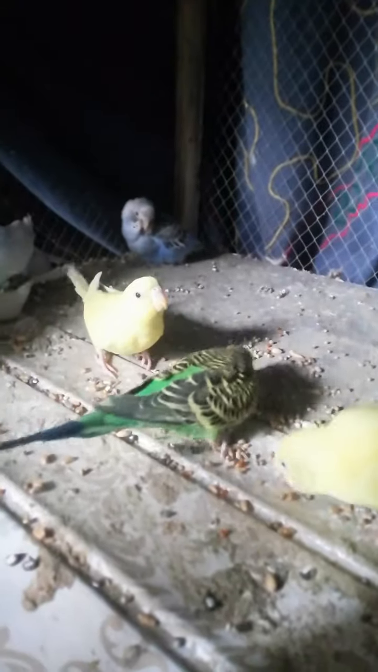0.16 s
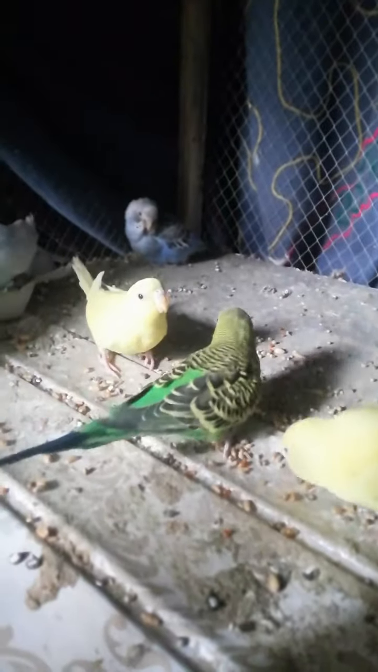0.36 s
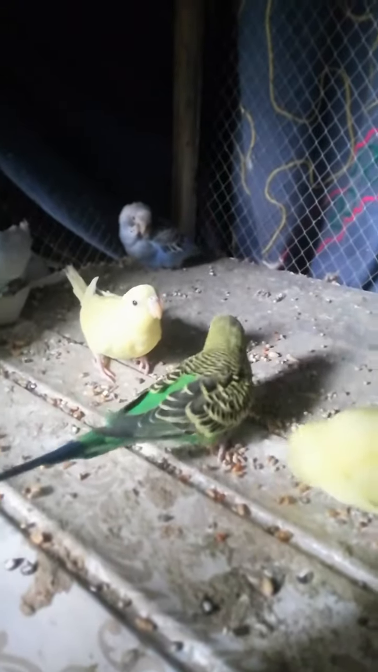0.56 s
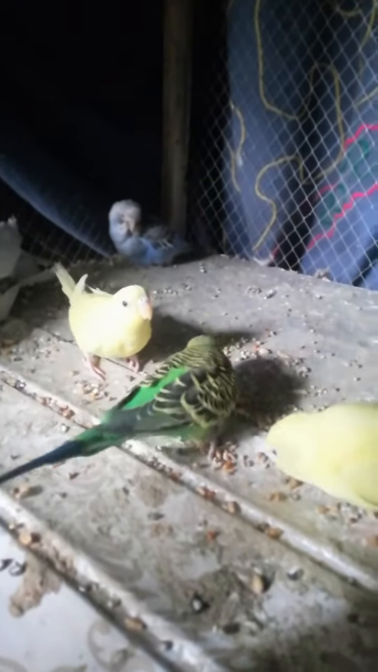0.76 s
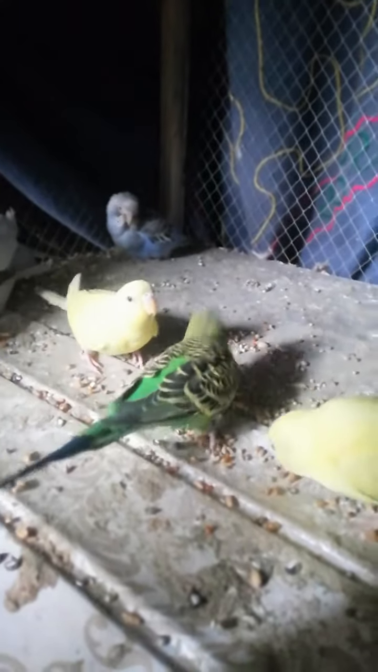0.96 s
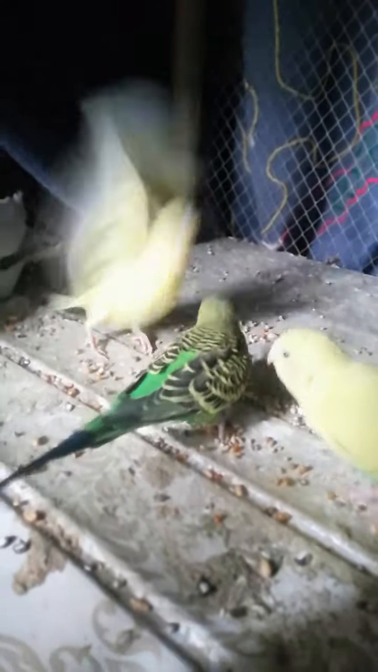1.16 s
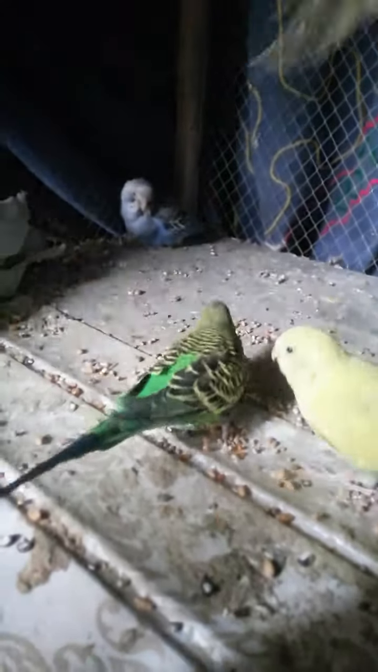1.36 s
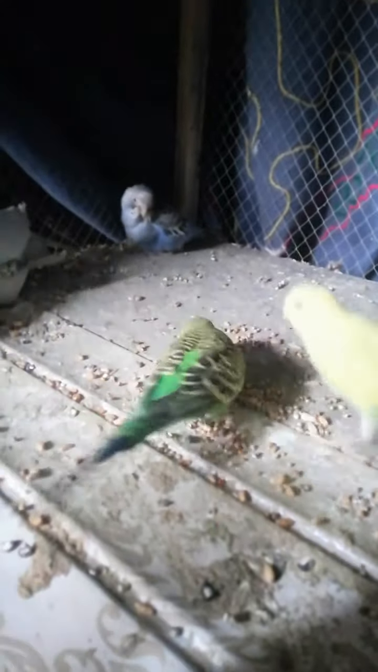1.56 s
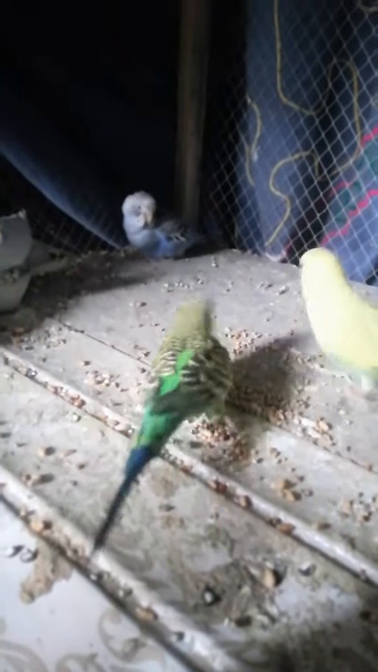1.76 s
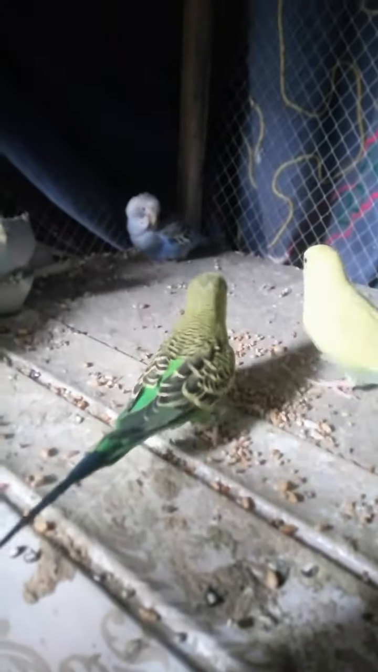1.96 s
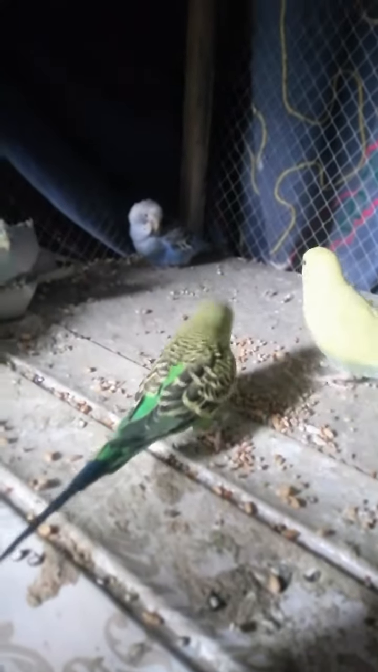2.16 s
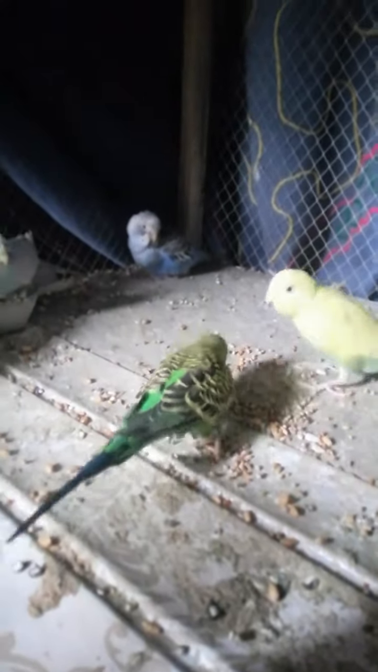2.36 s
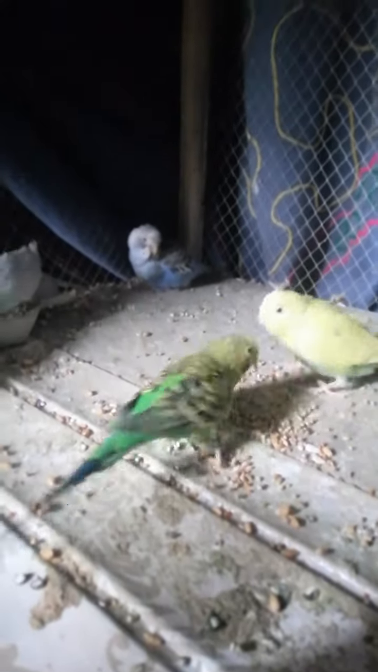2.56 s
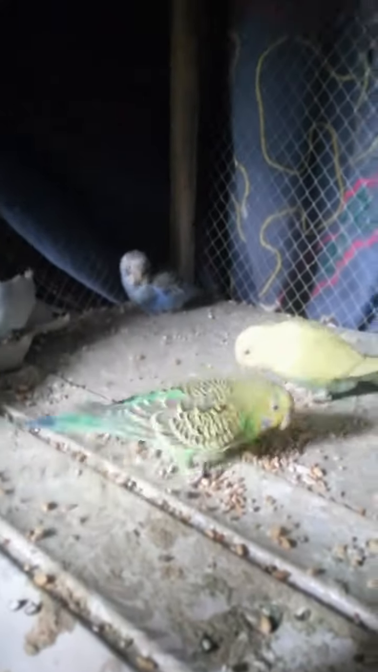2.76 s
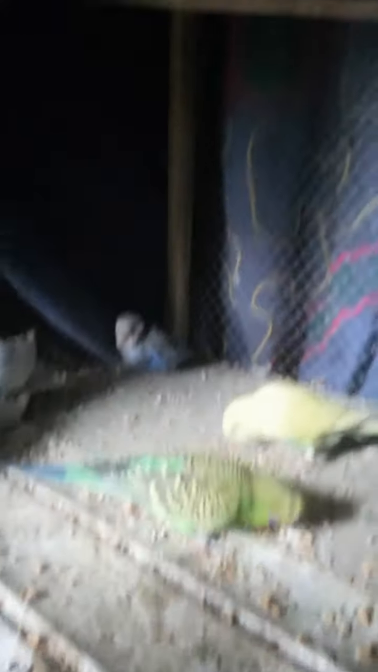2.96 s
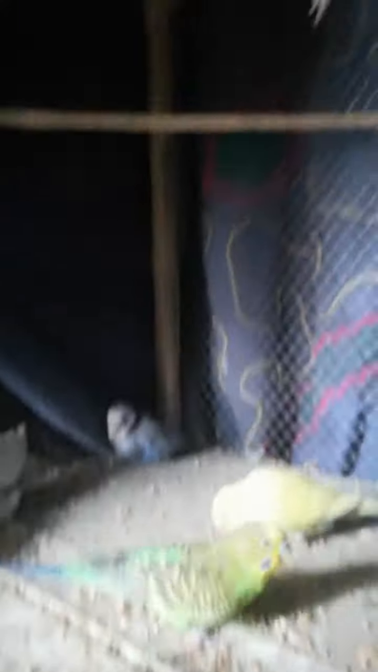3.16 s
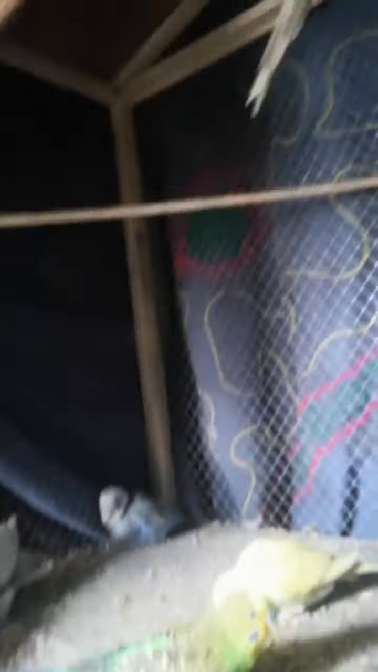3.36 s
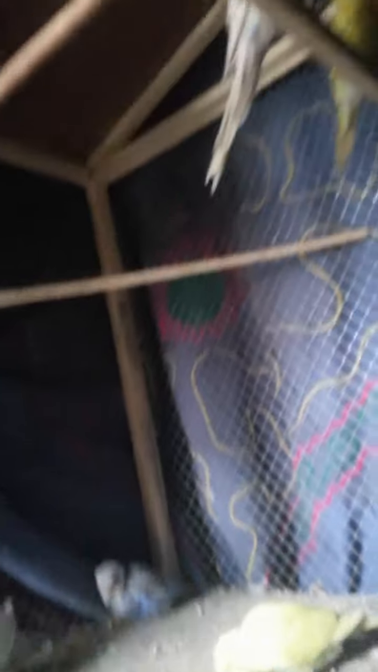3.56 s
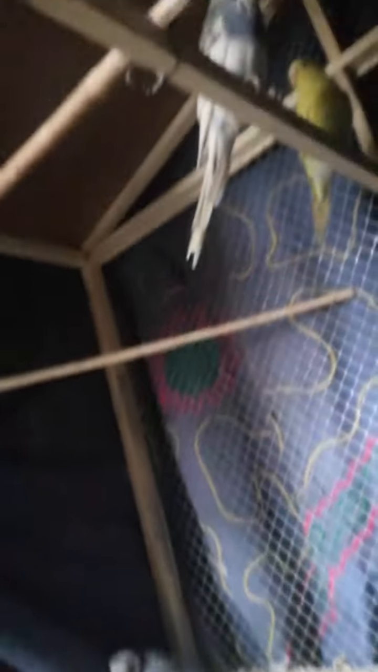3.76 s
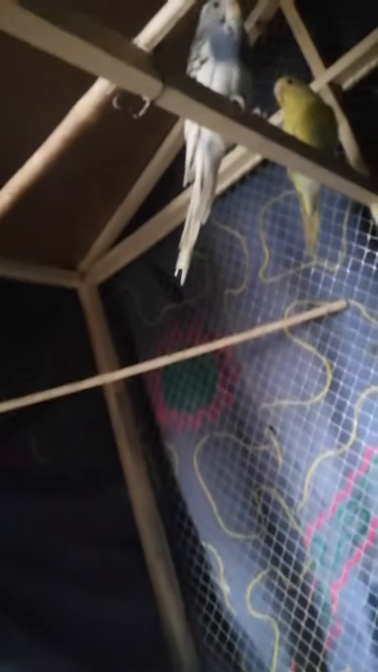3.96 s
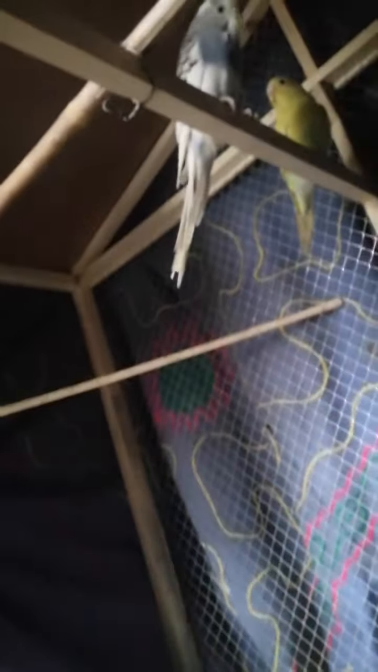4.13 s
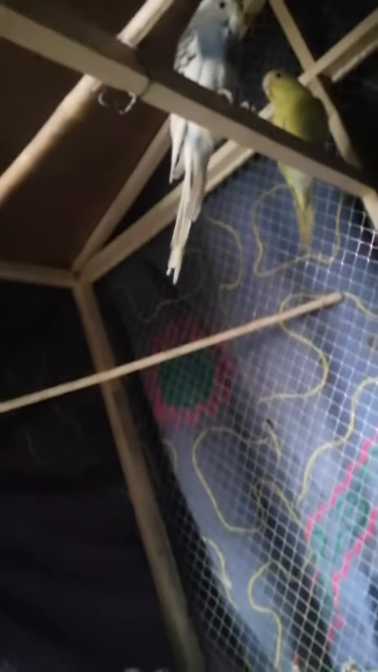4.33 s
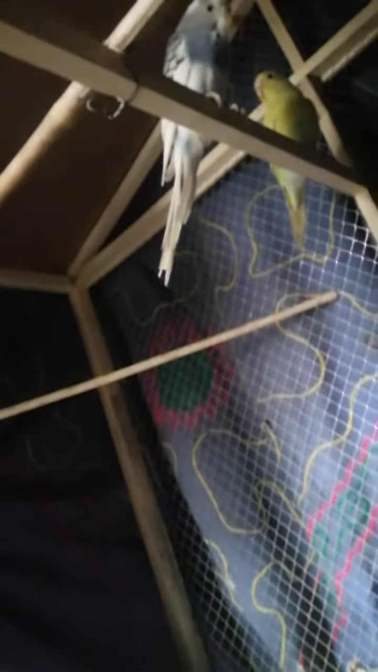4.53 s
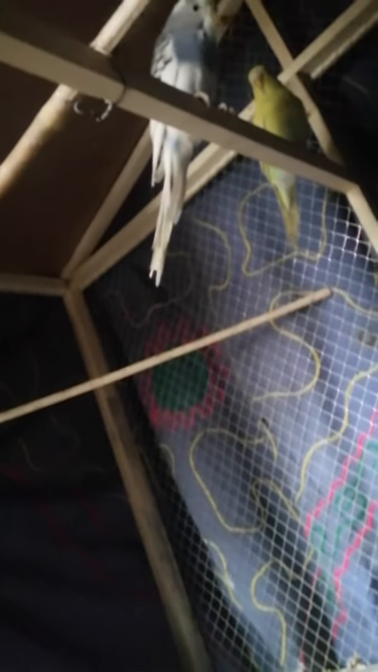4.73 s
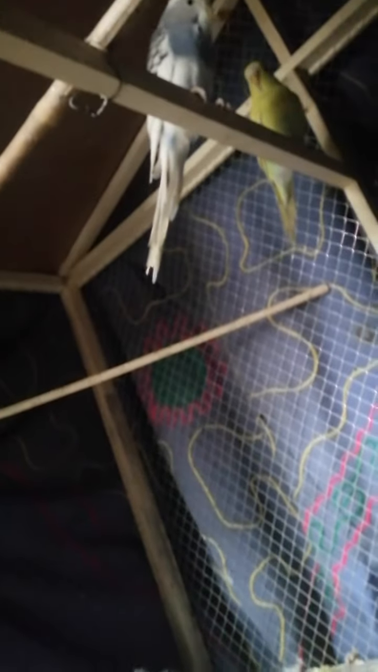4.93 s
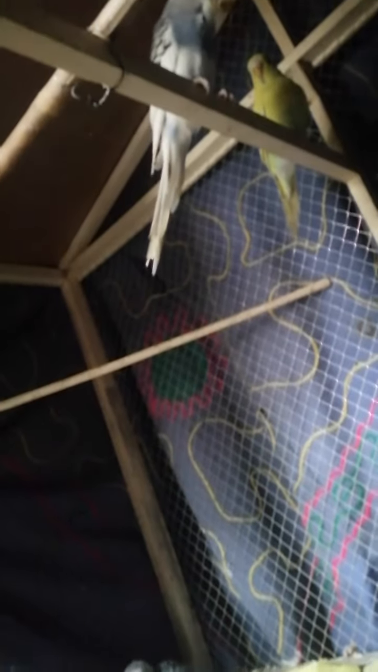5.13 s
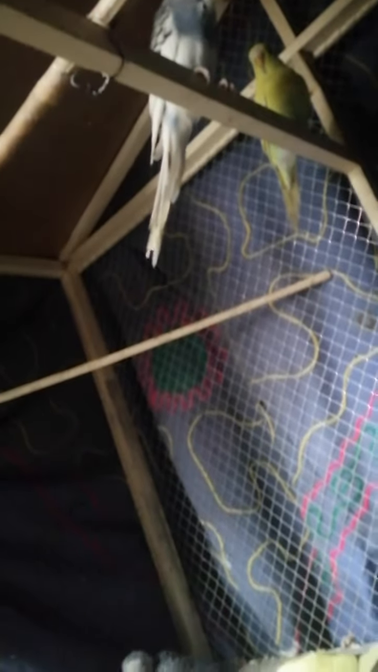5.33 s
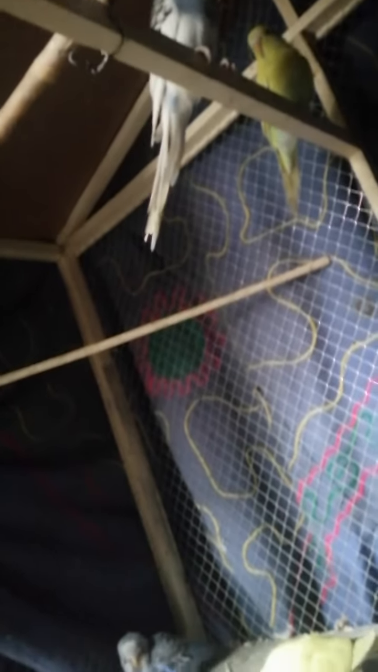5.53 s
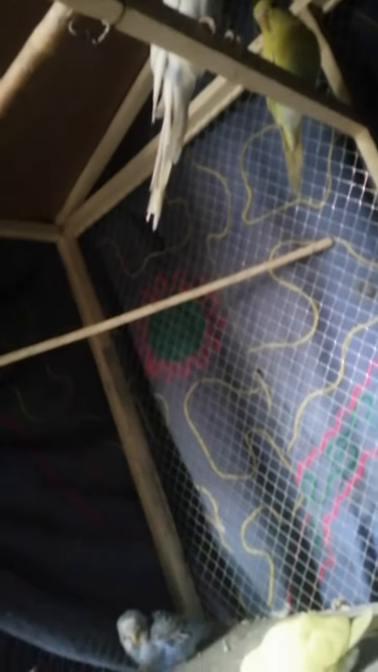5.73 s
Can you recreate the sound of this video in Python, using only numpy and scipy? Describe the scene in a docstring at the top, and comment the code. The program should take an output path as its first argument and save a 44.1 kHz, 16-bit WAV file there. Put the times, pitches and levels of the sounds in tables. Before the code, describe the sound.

Close, busy seed-cracking and light taps on a wooden cage floor, a sudden loud snap and wing flutter, then one short chirp.

```python
"""In a cloth-hung cage, small parrots feed on seed strewn over a board floor, close to a hand-held two-port recorder.
Beaks and claws crack husks and scrape (bursts of uneven noise); feet and beaks knock the board and a metal
fitting tinkles (dying sines). One bird flies up, thumping the frame and fanning air over the ports; one calls
once (a stack of partials). Seed rustles in tiny noise puffs over a faint hush. The right port rings near 5 kHz."""
import sys
import numpy as np
from scipy import signal
from scipy.fft import rfft, irfft, next_fast_len
from scipy.io import wavfile
from scipy.ndimage import uniform_filter1d

SR = 44100
rng = np.random.default_rng(int(sys.argv[2]) if len(sys.argv) > 2 else 0)


def output_pcm(signal):
    """Save a mono or channel-first signal as 16-bit PCM at the path in sys.argv[1].

    Samples are clipped to [-1, 1] before scaling.
    """
    pcm = np.clip(np.atleast_2d(signal).T, -1, 1) * 32767
    wavfile.write(sys.argv[1], SR, np.round(pcm).astype(np.int16))


N = 255339
T = np.arange(N) / SR


def amp(db):
    """Gain of a level in dB."""
    return 10 ** (np.asarray(db) / 20)


def unit(x):
    """Scales a sound to an rms of 1."""
    return x / np.sqrt(np.mean(x ** 2))


def fade(t, t60_s):
    """Natural dying away: down by 60 dB after t60_s seconds."""
    return np.exp(-np.log(1000) * t / t60_s)


def band(x, lo_hz, hi_hz, order=2):
    """Keeps the band between two frequencies."""
    edges_hz = [lo_hz, min(hi_hz, .45 * SR)]
    return signal.sosfilt(signal.butter(order, edges_hz, "band", fs=SR, output="sos"), x)


def colour(x, points):
    """Shapes the spectrum by (Hz, dB) points."""
    hz, db = np.transpose(points)
    size = next_fast_len(x.shape[-1])
    f = np.arange(size // 2 + 1) * SR / size + 1  # the 1 avoids log(0)
    gain = amp(np.interp(np.log(f), np.log(hz), db))
    return irfft(rfft(x, size) * gain, size)[..., :x.shape[-1]]


def walk(rate):
    """Random level that glides to a new value rate times a second; spread near 1."""
    hold = int(SR / rate)
    steps = np.repeat(rng.standard_normal(N // hold + 1), hold)
    return 1.2 * uniform_filter1d(steps, hold)[:N]


# When the left port hears a sound, against the right one, as the recorder tilts up; below 0 is earlier.
# Each row: time in seconds, lag in samples.
LEFT_LAG = [(0, -5), (1.2, -2), (2.6, -3), (3.2, 6), (4, 12), (5.8, 11)]


def add(bus, s, sound, pan_db):
    """Lays a sound on both ports: the lean sets their levels, the tilt shifts the left one in time."""
    lag = int(np.interp(s, *np.transpose(LEFT_LAG)))
    left = (0, int(s * SR) + lag, amp(pan_db / 2))
    right = (1, int(s * SR), amp(-pan_db / 2))
    for ch, start, gain in (left, right):
        part = sound[ch % len(sound)][:N - start]
        bus[ch, start:start + len(part)] += gain * part


def ring(modes, db, seconds, detune):
    """A struck body: a sum of dying sines, slightly retuned at each blow; peak 1."""
    t = np.arange(int(seconds * SR))[:, None] / SR
    hz, _, t60 = np.transpose(modes)
    hz = hz * (1 + detune * rng.standard_normal(len(hz)))
    sign = (-1) ** np.arange(len(hz))  # neighbouring modes start in opposite phase
    swell = np.minimum(t * 1000, 1)  # the blow takes a millisecond
    sines = np.sin(2 * np.pi * hz * t) * fade(t, np.maximum(t60, .005))
    y = (sign * swell * amp(db) * sines).sum(axis=1)
    return y / np.abs(y).max()


def husks(events, shape):
    """Noise bursts of uneven splinters under an outline; three bands tell what is bitten or scraped."""
    low, mid, high = np.zeros((3, 2, N))
    t_ms = np.arange(int(.08 * SR)) * 1000 / SR
    for s, db, low_db, high_db, pan_db, ms in events:
        steps = np.repeat(rng.standard_normal(len(t_ms) // 40 + 1), 40)[:len(t_ms)]
        splinters = amp(1.9 * steps - 0.5)
        shared, own = rng.standard_normal(len(t_ms)), rng.standard_normal((2, len(t_ms)))
        burst = (shared + 0.69 * own) * shape(t_ms, ms, splinters) * amp(db)
        lean_db = pan_db + 0.5  # the ringing right port supplies this much of the lean
        add(low, s, burst * amp(low_db), lean_db + 5.0)
        add(mid, s, burst, lean_db)
        add(high, s, burst * amp(high_db), 0.066 * lean_db)
    low = amp(10) * band(low, 878, 3820)
    mid = amp(-3.5) * band(mid, 2855, 6910)
    high = amp(6.5) * band(high, 7200, 17700)
    return low + mid + high


# Cracks by beaks and claws; the levels and the lean are settings, which husks() trims in each band.
# Each row: start in seconds, middle-band level in dB, low and high bands against it in dB,
# lean to the left port in dB.
CRACKS = [(.0312, -37, 2, -17, -16), (.0652, -27.5, -16, -19, -9.5), (.1101, -50, -23, -28, -5),
          (.139, -26.5, -0.5, -25, -10), (.2669, -36.5, -22, -37, -26), (.3274, -42.5, -22, -40, -33),
          (.3707, -30.5, -21, -23, -11), (.3937, -33, -22, -18, -4), (.5193, -35, -18, -16, -6.5),
          (.5936, -39.5, -3.5, -16, -9), (.6452, -28, -11, -26, -9.5), (.7236, -40.5, -14, -10, -19),
          (.7587, -31, -23.5, -25, -12), (.8616, -26.5, -3.5, -22, -8), (.902, -30.5, -10, -23, -8),
          (.9969, -32.5, -4.5, -23, -7.5), (1.0878, -27.5, -1.5, -21, -8), (1.139, -32.5, -19, -6, -18),
          (1.1682, -28.5, -0.5, -8.5, -12), (1.1834, -5.5, -24.5, -21.5, 2),
          (1.2372, -13.5, -21.5, -17.5, -11), (1.3014, -23, -39, -21, -5), (1.4839, -28, -16, -11, -11),
          (1.514, -23.5, -16.5, -15.5, 1), (1.5648, -29, -18.5, -13.5, -12.5),
          (1.6168, -41.5, -18, -8, -19), (1.9584, -27.5, -35, -31, -18.5), (2.023, -31.5, -16.5, -24, -7),
          (2.0769, -44, 9.5, -18, -11), (2.162, -31.5, -37, -23, -10), (2.3074, -35, -12, -17, -9.5),
          (2.4183, -42.5, -24, -4.5, 1), (2.463, -28.5, -8, -19, -10.5), (2.5154, -28.5, -8, -18, -5),
          (2.5593, -37, -16, -15, -7), (2.6275, -33.5, -16.5, -1.3, -23), (2.6935, -26.5, -16.5, -25, -10),
          (2.7548, -19.5, -28, -40, -10), (2.8426, -32.5, -3.5, -42, -12), (2.909, -27, -5.5, -46, -9),
          (2.9589, -39, 6, -17, -5), (3.037, -43, -1, -19, -11), (3.0824, -25, -18, -15.5, -10),
          (3.2315, -55, -5, 4.5, -6), (3.254, -33, -16.5, -34, -6.5), (3.2946, -42, -16, -1, -27),
          (3.3944, -22, -17, -56, -10), (3.4366, -32, 2.5, -14.5, -10), (3.4817, -45.5, 5.5, -22, -14),
          (3.5506, -26, -19.5, -27, -11), (3.6155, -39.5, -4, -20, -9), (3.6443, -28, -3.5, -14.5, -2.5),
          (3.9608, -35.5, -12.5, -46, -20), (3.9904, -59, -11, 10.5, -3), (4.0065, -45, -21, -1, -25),
          (4.04, -47.5, -16, -2.5, -18), (4.154, -41, -14, -10, -19), (4.1935, -34.5, 0, -5, -13.5),
          (4.2794, -29, 3.8, -19, -14), (4.3214, -38.5, -0.5, -23, -11), (4.341, -26, -21, -42, -5),
          (4.3989, -48.5, -5, -8.5, -19), (4.4425, -45, 3, -13, -2), (4.4716, -40, -14.5, -7.5, -23),
          (4.5447, -52.5, 1.8, -17, -19.5), (4.612, -27, -38, -36, -11), (4.635, -37.5, -17, -14, -19),
          (4.6766, -35.5, -34, -18, -13.5), (4.712, -32, -4, -18, -7), (4.7311, -28, -43, -26, -4),
          (4.9172, -31.5, -42, -20, -19), (4.9339, -24, -4.5, -27, -7.5), (4.9558, -24.5, -23, -42, -16),
          (5.0759, -45, -30, -19, -9), (5.173, -27, -17.5, -15.5, -13.5), (5.2278, -32.5, -18, -18, -17),
          (5.2345, -32, 1, -21, -12.5), (5.301, -27, -10.5, -24, -14), (5.3656, -46.5, 3, -15, -16),
          (5.4525, -50.5, 0.5, -22, -13), (5.5853, -35, -26, -55, -26.5), (5.6475, -36, -7, -40, -8),
          (5.7165, -29.5, -3.5, -42, -4)]
CRUNCH_MS, CRUNCH_SPREAD = 2.74, 0.29  # typical decay of the splinters; it varies from crack to crack
SNAP_DB, SNAP_MS = 3.5, 0.09  # the snap over the splinters, and its decay


def cracks():
    """A breaking husk: a sharp snap, then dying splinters."""
    decay_ms = CRUNCH_MS * np.exp(CRUNCH_SPREAD * rng.standard_normal(len(CRACKS)))

    def shape(t_ms, ms, splinters):
        crunch = splinters * np.minimum(t_ms, 1) * np.exp(-t_ms / np.clip(ms, .4, 20))
        return crunch + amp(SNAP_DB) * np.exp(-t_ms / SNAP_MS)

    return husks(np.column_stack([CRACKS, decay_ms]), shape)


# Claws and beaks dragging through seed; levels and lean are settings as for the cracks.
# Each row: start in seconds, middle-band level in dB, low and high bands against it in dB,
# lean to the left port in dB, length of the outline in ms (all stop by 80 ms).
SCRAPES = [(.13, -39.5, -39, -17, -18, 19), (.645, -51, -22, -28, -7.5, 88), (.904, -50, -16, -25, -9, 76),
           (1.14, -50, -12.5, -25, -7, 120), (1.195, -36.5, -13.5, -5.5, -15, 7.9),
           (1.3, -44.5, -18, -17.5, -6.5, 230), (1.87, -35.5, -27, -10, -25, 11.5),
           (1.948, -38.5, -16.5, -31, -5.5, 38), (2.074, -39.5, -30, -25, -4.5, 49),
           (2.615, -51.5, -28, -15, -25, 37), (2.69, -42, -28, -34, -16, 22),
           (2.778, -44, -22, -8.5, -22.5, 17), (2.915, -50, -12, -12, -15, 42),
           (2.965, -58, 3.5, -11, -11, 18.5), (3.035, -54.5, -22, -20, -4, 54),
           (3.333, -53.5, -2.5, -3.5, -22.5, 22.4), (4.2, -58, -25, -3.5, -26, 35),
           (4.33, -49.5, -6.5, -13, -14, 24), (4.95, -56, -13, -8.5, -13, 37),
           (5.158, -50, -13.5, -21, -10, 45), (5.3, -40, -18, -27, -1, 8.8),
           (5.45, -42.5, -47, -20.5, -10.5, 14), (5.641, -31.5, -66, -24, -9.5, 21),
           (5.708, -47.5, -8.5, -17, -15.5, 30)]


def scrapes():
    """Dragging through seed: a quick swell, a held crunch and an abrupt end."""
    def shape(t_ms, ms, splinters):
        return splinters * np.minimum(t_ms / 4, 1) * np.exp(-(t_ms / ms) ** 4)

    return amp(4) * husks(SCRAPES, shape)


# Clear knocks on the board.
# Each row: start in seconds, strength in dB, boost of the modes above 450 Hz in dB.
KNOCKS = [(.03, -26, -6), (0.176, -25, -12.5), (0.593, -27.5, -17.5), (.862, -36.5, -19.5),
          (.912, -27.5, -16), (.998, -35.5, -7), (1.088, -30, -13.5), (1.18, -25, -10.5), (1.301, -40, -15),
          (1.514, -33, -10), (1.616, -40.5, -3), (1.706, -33, -14), (1.972, -45, -11), (2.305, -42, -20.5),
          (2.434, -38.5, -7), (2.463, -26.5, -13.5), (2.628, -40.5, -24), (2.693, -48, -28),
          (2.816, -46, -7), (2.864, -38.5, -19), (2.965, -47.5, -25), (3.087, -27, -10), (3.36, -32, -12),
          (3.435, -31.5, -10), (3.564, -38.5, -17.5), (3.614, -38.5, -13), (3.656, -26, -9),
          (3.705, -38.5, -14), (3.777, -31, -20.5), (4.151, -44, -37), (4.197, -26.5, -9),
          (4.252, -33, -10.5), (4.281, -26.5, -11), (4.442, -26, -10.5), (4.476, -35.5, -18),
          (4.711, -24.5, -13.5), (4.934, -36.5, -14), (5.235, -45.5, -17), (5.309, -38, -43),
          (5.42, -35, -13), (5.721, -48.5, -30)]
KNOCK_PAN_DB, KNOCK_DRIFT_DB_PER_S = -7, -1.02  # the board slides to the right as the recorder tilts
PATTER_DB, PATTER_SPREAD_DB, PATTERS = -56.5, 5.5, 24  # softest footfall, half the range above it, count


def blows():
    """Lists the clear knocks, then faint footfalls at chance moments from anywhere on the board."""
    found = []
    for s, db, bright_db in KNOCKS:
        found.append((s, db, bright_db, KNOCK_PAN_DB + KNOCK_DRIFT_DB_PER_S * s))
    for when, size, dull, side in rng.random((PATTERS, 4)):
        s = .01 + when * T[-1] * .97
        found.append((s, PATTER_DB + 2 * PATTER_SPREAD_DB * size, -20 * dull, 30 * side - 15))
    return found


# The tones of the board. Each row: frequency in Hz, level in dB, time to die by 60 dB in seconds.
BOARD = [(129.6, -15, 0.16), (191, -7, 0.018), (317.4, 0.5, 0.033), (406, -2, 0.022), (473, 12.5, 0.022),
         (684, 11, 0.017), (784, 14, 0.015), (825, 16, 0.017), (1422, 5, 0.041)]


def knocks():
    """A soft push with a few rattling bounces rings the board at a new spot; the hollow below rumbles on."""
    out, (hz, db, _) = np.zeros((2, N)), np.transpose(BOARD)
    for s, strength_db, bright_db, pan_db in blows():
        spot_db = db + 3.23 * rng.standard_normal(len(hz)) + (hz > 450) * bright_db
        contact = np.zeros(int(.022 * SR))
        contact[rng.integers(60, len(contact), 4)] = 0.16 * rng.standard_normal(4)  # bounces
        contact[0] = -1  # the first push
        soft_contact = np.convolve(contact, np.hanning(44) / 20)
        blow = np.convolve(soft_contact, ring(BOARD, spot_db, .15, .04))
        add(out, s, amp(strength_db) * blow[None], pan_db)
    t = np.arange(int(.3 * SR)) / SR
    hollow = rng.standard_normal((2, len(t))) * fade(t, 0.21) * np.minimum(t / 0.03, 1)
    rumble = signal.fftconvolve(out, hollow, axes=1)[:, :N]
    return band(out + amp(-34) * rumble, 118, 2500)


# Taps on the metal fitting. Each row: start in seconds, strength in dB,
# brightness in dB per octave above the first tone in METAL, left minus right in dB.
TINKS = [(2.4185, -30.5, -11, -4.5), (4.6895, -38.5, -11, -7), (4.905, -34.5, 1, -9),
         (5.1741, -32, -9.5, -7), (5.264, -38, -17, -8.5)]
# The tones of the fitting. Each row: frequency in Hz, level in dB, time to die by 60 dB in seconds.
METAL = [(3510, -14, 0.059), (3385, 9.5, 0.17), (4020, 2, 0.1), (7300, 16, 0.13), (6850, 5, 0.15),
         (12780, 13.5, 0.11)]


def tinks():
    """Brief high ring of the metal fitting, its level chattering as it is nibbled."""
    out, (hz, db, _) = np.zeros((2, N)), np.transpose(METAL)
    chatter = amp(4 * walk(200))
    for s, strength_db, upper_db, pan_db in TINKS:
        tap_db = db + np.log2(hz / hz[0]) * upper_db
        add(out, s, amp(strength_db) * ring(METAL, tap_db, .12, .003)[None], pan_db)
    return out * chatter


# The course of the one call. Each row: time in seconds, pitch in Hz, effort in dB,
# brightness in dB per partial, counted from the second.
CALL = [(1.735, 1576, -39.5, 0), (1.766, 1495, -43, -0.5), (1.791, 1555, -36.5, 0.5),
        (1.814, 1555, -34.5, 0.2), (1.84, 1592, -35.5, -0.5), (1.87, 1532, -39, 0.7), (1.89, 1473, -41, 0),
        (1.907, 1360, -38.5, 0.5), (1.925, 1246, -38.5, -1.3)]
# How the throat favours frequencies. Each row: frequency in Hz, gain in dB.
THROAT = [(1250, 1.5), (1470, 11), (1590, -4), (2600, -0.5), (3170, 7), (4000, 0.5), (4450, 1), (4680, 5.5),
          (5000, -2.5), (5950, -13), (6220, -5.5), (6500, -24), (7800, -15.5), (10500, -20.5),
          (12500, -13.5), (14000, -16), (15500, -38)]
CALL_PAN_DB, CALL_LAG_S = -9.5, 0.00015  # left minus right, and how much later the left port hears it
CALL_ATTACK_S, CALL_RELEASE_S, CALL_EDGE_DB = 0.0069, 0.011, -34  # fades, and the level at their outer ends


def call():
    """Clean partials on a wavering, then falling pitch, coloured by the throat, with a quick slight tremble."""
    s, hz, effort_db, bright_db = np.transpose(CALL)
    start, end = s[0] - CALL_ATTACK_S, s[-1] + CALL_RELEASE_S
    out, pitch = np.zeros((2, N)), np.interp(T, s, hz)
    edges_db = np.interp(T, [start, s[0], s[-1], end], [CALL_EDGE_DB, 0, 0, CALL_EDGE_DB])
    level_db = np.interp(T, s, effort_db) + edges_db
    tilt_db = np.interp(T, s, bright_db)
    voiced = ((T > start) & (T < end)) * amp(walk(120))
    throat_hz, throat_db = np.transpose(THROAT)
    turns = np.cumsum(pitch) / SR
    for ch, lag, lean_db in ((0, CALL_LAG_S, CALL_PAN_DB / 2), (1, 0, -CALL_PAN_DB / 2)):
        phase = 2 * np.pi * np.interp(T - lag, T, turns)
        for k in range(1, 12):
            db = level_db + np.interp(k * pitch, throat_hz, throat_db) + (k - 2) * tilt_db
            out[ch] += voiced * amp(db + lean_db) * np.sin(k * phase)
    return out


# Downstrokes of the take-off. Each row: start in seconds, strength in dB.
WING_BEATS = [(1.189, -24), (1.309, -32), (1.36, -28), (1.423, -40.5), (1.49, -43.5)]
# The cage frame's low thump. Each row: frequency in Hz, level in dB, time to die by 60 dB in seconds.
FRAME = [(56.4, 0, 0.093)]


def wing_beats():
    """Each downstroke thumps the cage frame, a low dying sine equally strong at both ports."""
    out = np.zeros((2, N))
    for s, strength_db in WING_BEATS:
        add(out, s, amp(strength_db) * ring(FRAME, 0, .2, .04)[None], 0)
    return band(out, 30, 310)


# Seed rustling under busy feet; the right port gets a little more than the left.
# Each row: time in seconds, level in dB midway between the ports.
RUSTLE = [(0, -55.5), (.15, -50), (.45, -72.5), (.9, -64.5), (1.35, -49), (1.7, -49.5), (2.1, -57.5),
          (2.27, -68), (2.55, -51.5), (2.95, -50), (3.28, -65.5), (3.45, -52.5), (3.9, -67.5), (4.6, -61),
          (5.1, -71.5), (5.28, -52.5), (5.55, -65), (5.79, -55.5)]
# The colour of rustling husks. Each row: frequency in Hz, level in dB per Hz.
HUSK = [(150, 7.5), (350, 7.5), (900, -5.5), (2000, -5), (3000, 2.5), (5000, 0), (8000, -5), (12000, -17),
        (15000, -15)]


def rustle(rate=700, spread_db=4):
    """Dense tiny husk ticks of very uneven size, in clumps; each is a very short puff of noise."""
    sizes = amp(spread_db * np.minimum(rng.exponential(size=N), 4) + 3 * walk(60))
    ticks = (rng.random(N) < rate / SR) * sizes  # rate is ticks per second
    puffs = signal.lfilter([1], [1, -np.exp(-1 / (.001 * SR))], ticks)  # each dies in about 1 ms
    shared, own = rng.standard_normal(N), rng.standard_normal((2, N))
    grains = unit(colour(puffs * (shared + 3.0 * own), HUSK))
    lean_db = np.array([[-2.5], [2.5]])
    return grains * amp(np.interp(T, *np.transpose(RUSTLE)) + lean_db)


# Air moving over the ports as the hand sways. Each row: time in seconds, level in dB.
DRAUGHT = [(0, -50), (.3, -68.5), (1, -56), (1.5, -55.5), (1.8, -63), (2.35, -67), (2.55, -53),
           (2.8, -64.5), (3.3, -61.5), (3.55, -50), (3.95, -68.5), (4.35, -54), (4.75, -64), (5.35, -58.5),
           (5.79, -65)]
PUFF_DB, PUFF_LATE_S, PUFF_S = -20, 0.012, 0.041  # a downstroke's gust: against its thump, delay, half length


def draught():
    """Low turbulent pressure, mostly common to both ports; each downstroke adds a puff."""
    shared, own = rng.standard_normal(N), rng.standard_normal((2, N))
    air = unit(band(shared + .8 * own, 36, 130)) * amp(2 * walk(14))
    puffs = np.zeros(N)
    for s, db in WING_BEATS:
        puffs += amp(db + PUFF_DB) * np.exp(-((T - s - PUFF_LATE_S) / PUFF_S) ** 2)
    return air * (amp(np.interp(T, *np.transpose(DRAUGHT))) + puffs)


# The colour of the background. Each row: frequency in Hz, level in dB per Hz.
HUSH = [(59, -33), (100, -8), (328, -9.5), (1250, -4.5), (2690, -11.5), (4020, -3), (5420, -10.5),
        (7940, -9), (15000, -16), (16000, -14)]
HUSH_DB = -69


def hush():
    """Steady faint background noise, flickering a little."""
    return unit(colour(rng.standard_normal((2, N)), HUSH)) * amp(HUSH_DB + 0.5 * walk(12))


CAGE_T60_S, CAGE_DB = 0.059, -11.5  # the cage's tail: time to die by 60 dB, and level


def scene():
    """Sums all sources; the cloth walls return a short dull tail of the near ones."""
    near = cracks() + scrapes() + knocks() + tinks() + call() + rustle()
    t = np.arange(int(.3 * SR)) / SR
    tail = band(rng.standard_normal((2, len(t))), 120, 8600, order=1)
    tail = tail * fade(t, CAGE_T60_S) * (t > .003)
    tail = tail / np.sqrt((tail ** 2).sum(axis=1, keepdims=True))
    walls = amp(CAGE_DB) * signal.fftconvolve(near, tail, axes=1)[:, :N]
    return near + walls + wing_beats() + draught() + hush()


# Each port's resonances and dips. Each row: frequency in Hz, width in Hz, gain in dB.
LEFT_PORT = [(4050, 2100, -9.5), (9640, 1400, 5)]
RIGHT_PORT = [(2360, 1050, 3), (3950, 2140, -8), (5295, 690, 11.5), (7900, 5060, -6.5)]
TOP_HZ = 16300


def record(dry):
    """Each port's cavity boosts or dips parts of what it hears; the recorder cuts the top."""
    out = []
    for heard, port in zip(dry, (LEFT_PORT, RIGHT_PORT)):
        for hz, width_hz, db in port:
            peak = signal.lfilter(*signal.iirpeak(hz, hz / width_hz, fs=SR), heard)
            heard = heard + (amp(db) - 1) * peak
        out.append(heard)
    return signal.sosfilt(signal.ellip(10, .2, 60, TOP_HZ, fs=SR, output="sos"), np.array(out))


dry = scene()
out = record(dry)
output_pcm(out)
```